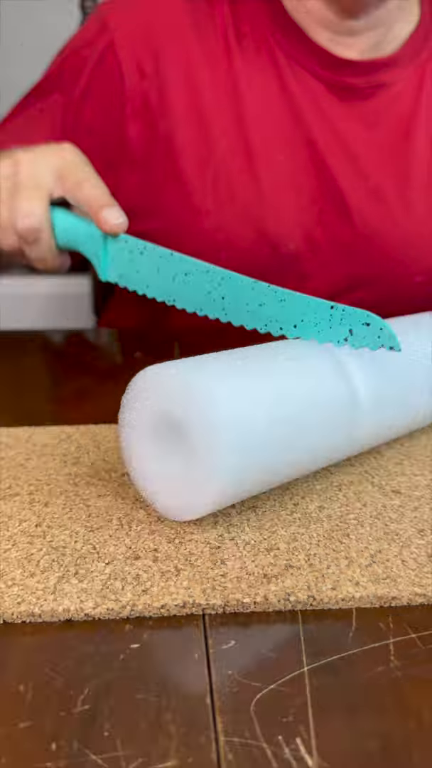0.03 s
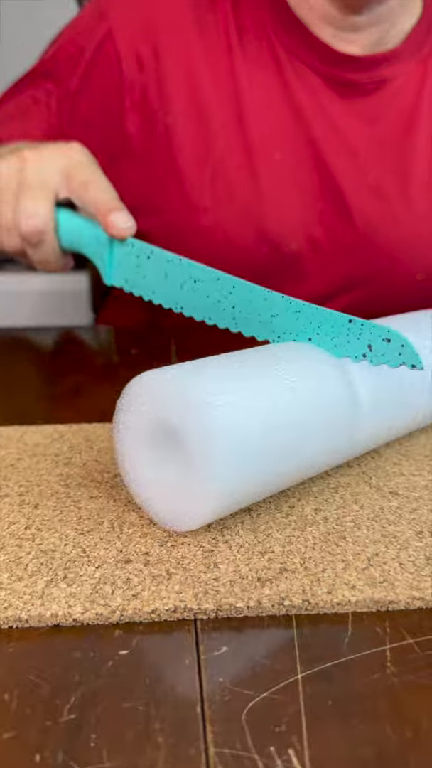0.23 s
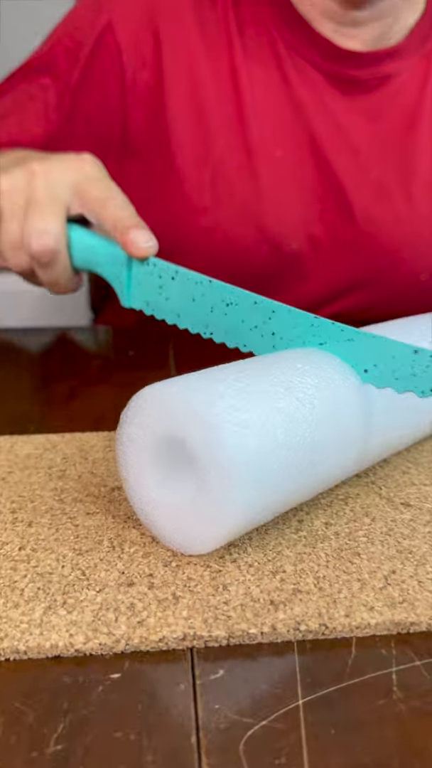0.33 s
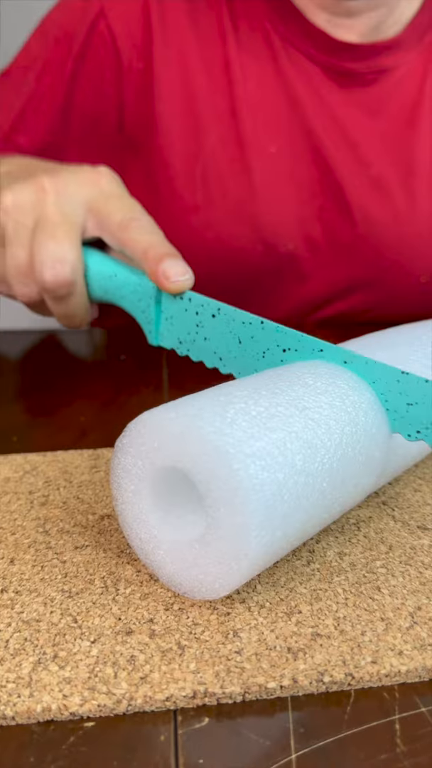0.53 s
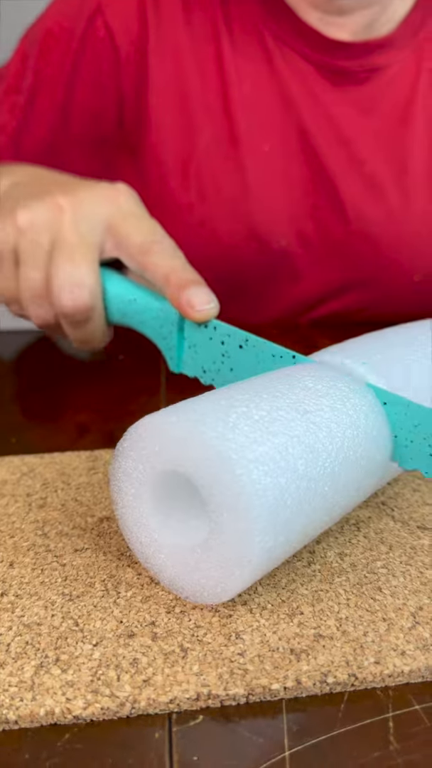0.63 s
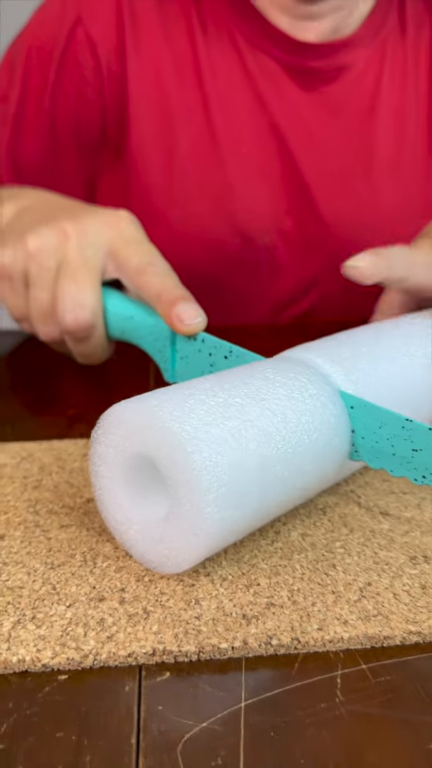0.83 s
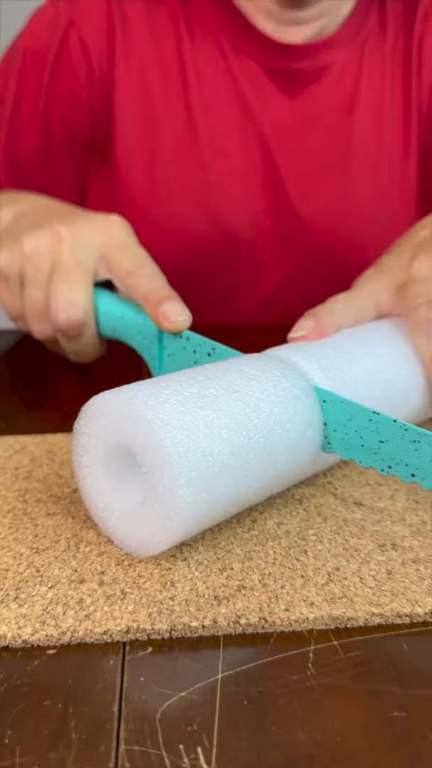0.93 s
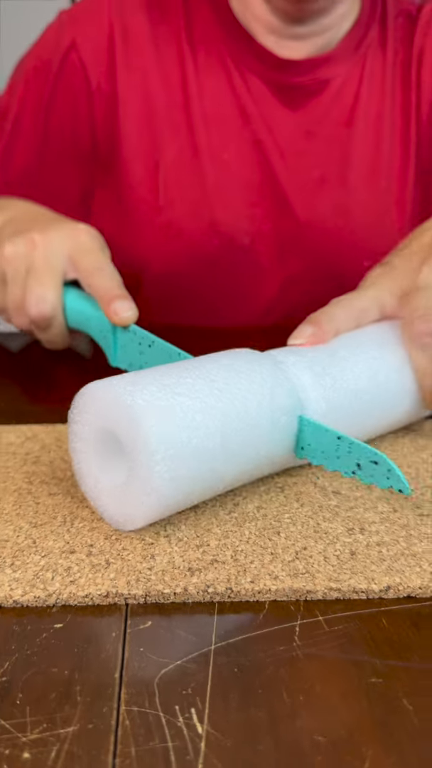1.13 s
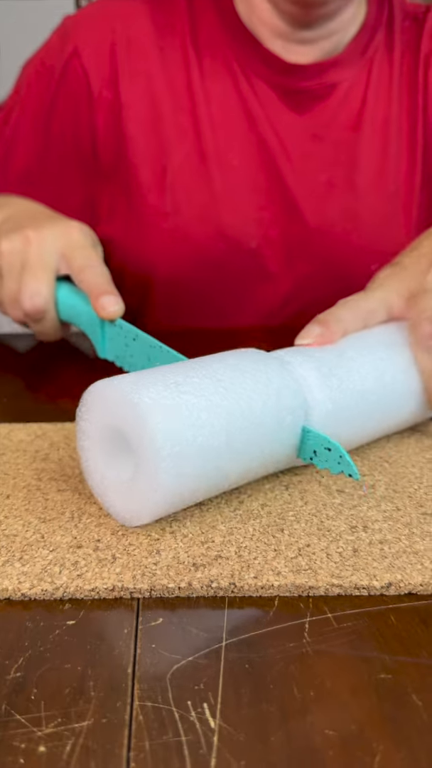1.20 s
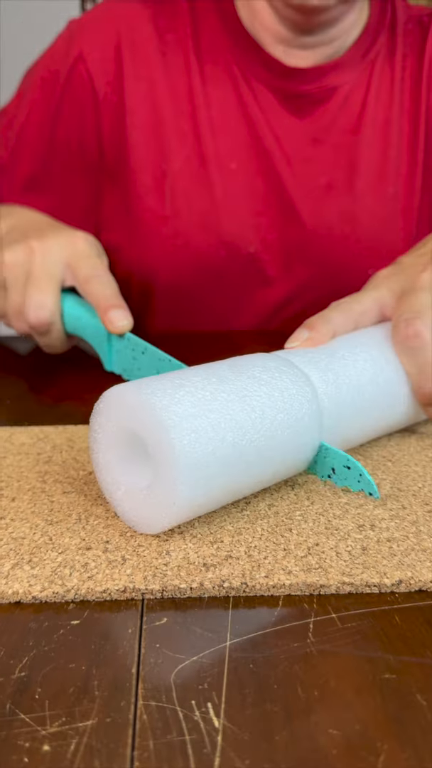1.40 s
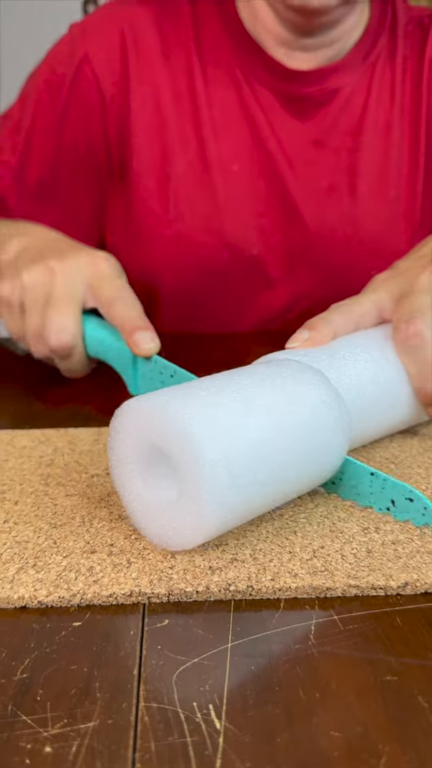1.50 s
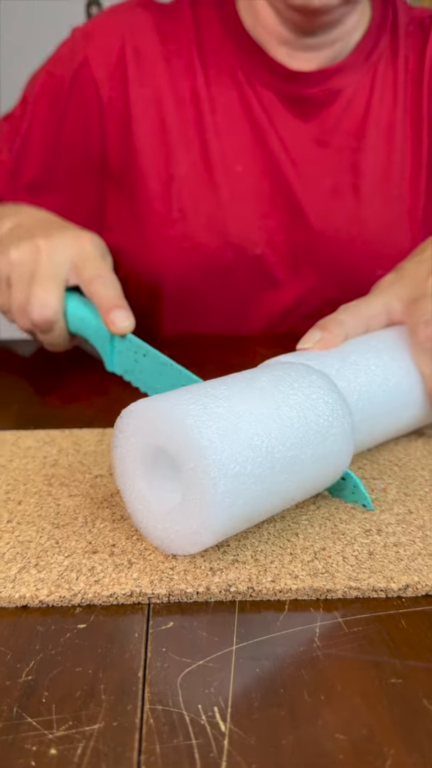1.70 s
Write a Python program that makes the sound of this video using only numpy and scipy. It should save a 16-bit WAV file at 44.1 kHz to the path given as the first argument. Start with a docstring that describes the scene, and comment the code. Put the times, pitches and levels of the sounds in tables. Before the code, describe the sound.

Foam sawing: a coarse crunchy push, table knocks, a finer raspy pull, then a brief last push

```python
"""Over mains hum and room noise, a serrated knife settles on a foam noodle lying on a cork mat: a thin hiss.
A long push bites in: random cell pops, grouped by catching teeth, crackle, sound the tube and shake the mat.
Thicker walls snap on top as cracks with a crumble; pops and snaps all ring and spread in blade and tube.
Between strokes the blade rubs as filtered grain, and decaying modes make table knocks and soft bumps.
A long, finer pull and a short push follow, with a ringing tube, while the hum swells towards the end."""
import sys
import numpy as np
from scipy import signal
from scipy.fft import rfft, irfft
from scipy.io import wavfile
from scipy.ndimage import uniform_filter1d

SR = 44100
rng = np.random.default_rng(int(sys.argv[2]) if len(sys.argv) > 2 else 0)


def int16_out(signal):
    """Quantize to a 16-bit WAV file."""
    q = np.round(np.clip(np.atleast_2d(signal).T, -1, 1) * 32767)
    wavfile.write(sys.argv[1], SR, q.astype(np.int16))


N = 77175


def undb(db):
    """Decibels to gain."""
    return 10 ** (np.asarray(db) / 20)


def unit(x):
    """Scale to rms 1."""
    return x / np.sqrt(np.mean(x ** 2))


def times():
    """Time of every sample [s]."""
    return np.arange(N) / SR


def follow(points, **ends):
    """Gain that follows (time [s], level [dB]) points; ends set the level outside them."""
    at, db = np.array(points).T
    return undb(np.interp(times(), at, db, **ends))


def freqs():
    """Frequencies on which filters are drawn [Hz]."""
    return np.maximum(np.arange(N + 1) * SR / (2 * N), 1)


def through(x, response):
    """Filter by a frequency response, padded so the end does not wrap round."""
    return irfft(rfft(x, 2 * N) * response)[:N]


def shape(points):
    """Join (frequency [Hz], level [dB]) points on a log frequency axis."""
    hz, db = np.array(points, float).T
    return np.interp(np.log(freqs()), np.log(np.maximum(hz, 1)), db)


def colour(x, points):
    """Causal filter through (frequency [Hz], level [dB]) points."""
    # folding the cepstrum forwards gives minimum phase: no sound before its cause
    cepstrum = irfft(np.log(undb(shape(points))))
    cepstrum[1:N] *= 2
    cepstrum[N + 1:] = 0
    return through(x, np.exp(rfft(cepstrum)))


def band(x, lo_hz, hi_hz):
    """Steep band-pass."""
    edges = [lo_hz, min(hi_hz, SR / 2 - 100)]
    return signal.sosfilt(signal.butter(N=3, Wn=edges, btype="band", fs=SR, output="sos"), x)


def walk(rate):
    """Slow random drift with spread near 1, through `rate` new points a second."""
    return np.interp(times() * rate, np.arange(N), rng.standard_normal(N))


def burst(decay_s):
    """Dying noise of unit energy."""
    x = rng.standard_normal(N) * np.exp(-times() / decay_s)
    return x / np.linalg.norm(x)


def tearing(cells_per_s, scatter_db, teeth_hz, release_s, slip):
    """Cells pop at random, hardest just after a tooth catches; slip is the share left between catches."""
    t = times()
    gaps = rng.gamma(3, 1 / 3, size=2000) / teeth_hz
    catches = np.r_[0, np.cumsum(gaps)]
    tooth = np.searchsorted(catches, t, side="right") - 1
    catch_gain = undb(rng.standard_normal(len(catches)))
    grip = slip + catch_gain[tooth] * np.exp(-(t - catches[tooth]) / release_s)
    popping = rng.random(N) < cells_per_s / SR
    sizes = undb(scatter_db * np.clip(rng.standard_normal(N), -2, 2))
    pops = popping * rng.choice([-1, 1], N) * sizes * grip
    # even out the loudness over 25 ms, keeping the grain of the teeth
    return pops / np.sqrt(uniform_filter1d(pops ** 2, int(0.025 * SR)) + 1e-12)


def strikes(events, modes, scatter_db):
    """Each blow rings decaying modes, slightly scattered, with its own weight on the lowest."""
    out = np.zeros(N)
    for at, db, low_db in events:
        age = np.maximum(times() - at, 0)
        luck = rng.standard_normal((len(modes), 2))
        for k, ((hz, mode_db, t60), (level_luck, pitch_luck)) in enumerate(zip(modes, luck)):
            gain = undb(db + mode_db + low_db * (k == 0) + scatter_db * level_luck)
            tone = np.sin(2 * np.pi * hz * (1 + 0.014 * pitch_luck) * age)
            out += (-1) ** k * gain * tone * np.exp(-np.log(1000) * age / t60)
    return out


def scuffs(events, decay_s):
    """A short rush of noise at each event (time [s], level [dB], ...)."""
    t = times()
    rushes = sum(undb(db) * (t >= at) * np.exp(-np.abs(t - at) / decay_s) for at, db, *_ in events)
    return rng.standard_normal(N) * rushes


# tone of the room noise: (frequency [Hz], relative level [dB])
ROOM_TONE = [(30,-1),(70,3.5),(120,-4),(280,7.5),(480,5),(700,-2),(1100,-15.5),(2000,-26),(16000,-45)]
ROOM_DB = -52.5


def air():
    """Low room noise: steady noise filtered towards the bass."""
    return unit(colour(rng.standard_normal(N), ROOM_TONE)) * undb(ROOM_DB)


# hum partials: (frequency [Hz], level before swell and waver [dB], share of the swell [0-1])
HUM_PARTIALS = [(120.3,-68.5,0.15),(240,-54.5,0.12),(475.6,-56,0.88)]
# swell of the hum: (time [s], level change before each partial's share [dB])
HUM_RISE = [(0,-9.5),(1.55,-2.5),(1.72,5)]
HUM_WAVER_DB, HUM_WANDER_RAD = 2, 0.67


def hum():
    """Soft mains hum: sines wavering in level and phase, rising to a swell near the end."""
    t = times()
    swell_db = np.interp(t, *np.array(HUM_RISE).T)
    out = np.zeros(N)
    for hz, db, share in HUM_PARTIALS:
        gain = undb(db + share * swell_db + HUM_WAVER_DB * walk(13.97))
        phase = 2 * np.pi * hz * t + HUM_WANDER_RAD * walk(23.86)
        out += np.sqrt(2) * gain * np.sin(phase)  # root 2: the levels are rms
    return out


# light rubbing of the blade in the slit: (time [s], level [dB])
RUB_LEVEL = [(0.04,-84),(0.12,-67),(0.18,-67),(0.72,-70),(0.757,-39),(0.785,-55),(0.801,-44.5),(0.82,-53.5),(0.845,-45.5),(0.88,-53),(0.9,-45),(0.93,-54),(1.28,-75),(1.48,-42),(1.56,-63),(1.59,-64),(1.617,-51),(1.75,-48.5)]
# its tone: (frequency [Hz], relative level [dB])
RUB_TONE = [(900,-7.5),(1200,-8),(1600,-2),(2500,-3),(4200,0.5),(6000,-3.5),(9000,-9),(16000,-8.5)]


def rubbing():
    """Fine grain of the blade sliding without cutting: dense pops, little gripped by the teeth."""
    grain = tearing(cells_per_s=9900, scatter_db=5.0, teeth_hz=270, release_s=0.0054, slip=0.86)
    return unit(band(colour(grain, RUB_TONE), 820, SR / 2)) * follow(RUB_LEVEL)


# hiss of the blade settling on the foam skin: (time [s], level [dB])
SETTLE_LEVEL = [(0.05,-79),(0.086,-69.5),(0.135,-62),(0.18,-69)]
SETTLE_LO_HZ, SETTLE_HI_HZ = 2920, 4760


def settling():
    """Blade settling on the foam skin: a thin band of noise."""
    hiss = unit(band(rng.standard_normal(N), SETTLE_LO_HZ, SETTLE_HI_HZ))
    return hiss * follow(SETTLE_LEVEL, right=-120)


# low rumble of the noodle shifting on the mat: (time [s], level [dB])
SHIFT_LEVEL = [(0.16, -69), (0.223, -39.5), (0.566, -48), (0.606, -34), (0.802, -48), (0.876, -53),
               (0.908, -48.5), (1.036, -49), (1.066, -53), (1.106, -51.5), (1.236, -49.5), (1.31, -62),
               (1.354, -49.5), (1.416, -70), (1.462, -45.5), (1.612, -82), (1.704, -48.5), (1.75, -54)]
# its tone: (frequency [Hz], relative level [dB])
SHIFT_TONE = [(30,-17),(60,-32),(85,-8),(118,4),(150,-8),(200,-4.5),(300,-11),(1100,-16),(1600,-36),(16000,-83)]


def shifting():
    """The noodle rocks and drags on the cork: bass-heavy noise that comes and goes."""
    return unit(colour(rng.standard_normal(N), SHIFT_TONE)) * follow(SHIFT_LEVEL, left=-120)


def stroke(curve, tone, pops, crackle_db, body_db, rumble_db):
    """One pass of the blade: the same pops crackle, sound the tube and shake the mat."""
    at, *levels = np.array(curve).T
    trims = (crackle_db, body_db, rumble_db)
    bands = [(1200, 17000), (300, 1200), (125, 300)]  # crackle, body, rumble [Hz]
    t, sound = times(), colour(pops, tone)
    gate = np.clip(np.minimum(t - at[0], at[-1] - t) / 0.004 + 1, 0, 1)  # 4 ms ramps
    out = np.zeros(N)
    for edges, db, trim in zip(bands, levels, trims):
        out += unit(band(sound, *edges)) * undb(np.interp(t, at, db) + trim)
    return gate * out


# passes of the blade: (time [s], crackle, tube body and low rumble levels before trim [dB])
BITE_LEVELS = [(0.17, -79, -61, -52), (0.196, -43.5, -47, -37.5), (0.268, -27.5, -34, -42),
               (0.298, -25.5, -34.5, -32), (0.31, -34, -44, -50), (0.332, -26, -35, -46),
               (0.352, -26, -33, -31), (0.392, -28, -36, -44), (0.408, -38, -49.5, -55),
               (0.452, -29.5, -35.5, -36.5), (0.48, -39, -56, -39)]
PUSH_LEVELS = [(0.48, -37, -42, -48), (0.497, -32, -40, -37.5), (0.522, -28.5, -34, -27.5),
               (0.592, -27.5, -35, -34.5), (0.622, -22, -27, -32.5), (0.666, -38.5, -51.5, -52),
               (0.67, -27, -46, -38), (0.692, -30.5, -33.5, -34), (0.714, -44, -67, -45),
               (0.73, -70, -49, -46)]
PULL_LEVELS = [(0.953, -43, -51, -64), (0.968, -45.5, -47, -63), (0.973, -31.5, -43, -56),
               (0.994, -35.5, -50, -63), (1.03, -23, -42, -46), (1.046, -22, -35, -35),
               (1.142, -22.5, -39, -47), (1.15, -19, -33.5, -41.5), (1.172, -24, -39, -35),
               (1.238, -30.5, -44.5, -68), (1.282, -61, -76, -64), (1.29, -59, -70, -66)]
SHORT_LEVELS = [(1.29, -59.5, -66, -62), (1.344, -37, -55, -55), (1.418, -36.5, -46, -46),
                (1.452, -29, -41, -45), (1.466, -31.5, -44, -40), (1.49, -50, -46, -45),
                (1.542, -59, -61, -52), (1.56, -80, -66, -69)]
# tone of each pass: (frequency [Hz], relative level [dB])
BITE_TONE = [(50, -32), (103, -11), (277, -5.5), (428, -3.5), (495, -3.5), (842, -3), (1120, -13),
             (1910, -2), (2440, -16.5), (3180, -7), (4450, -16), (5950, -12), (8750, -20), (14200, -16.5),
             (16000, -16)]
PUSH_TONE = [(50, -53), (85, -8), (114, -9), (246, -8), (495, -2.5), (863, 0), (1240, -12.5), (1960, -4),
             (2620, -7.5), (3180, -3.5), (4140, -8.5), (5810, -9), (7210, -9.5), (11700, -8.5),
             (16000, -12)]
PULL_TONE = [(50, -53), (68, -13), (128, -11), (234, -8.5), (264, -19), (418, -9), (678, -17),
             (1270, -11.5), (1910, -0.5), (2320, -7), (2810, -2), (5810, -8), (9640, -19), (12300, -12.5),
             (16000, -22)]
SHORT_TONE = [(50, -15), (175, -18), (223, -5.5), (264, -11), (306, -5.5), (507, -11), (1360, -6),
              (1740, -9), (2010, -4.5), (2440, -6.5), (6550, -4), (16000, -17.5)]
# resonances of blade and tube: (frequency [Hz], width [Hz], level against the direct sound [dB])
BLADE_TUBE_RINGS = [(211,93,-2.5),(805,107,-2.5),(1930,78,-11.5)]
SPREAD_S = 0.001034  # travel time of a 1 kHz bending wave; higher ones arrive sooner


def cutting():
    """Coarse tearing on the pushes, a finer rasp on the pull, all ringing and spreading in blade and tube."""
    bite = tearing(cells_per_s=3200, scatter_db=2.5, teeth_hz=149.4, release_s=0.0033, slip=0.16)
    push = tearing(cells_per_s=3800, scatter_db=3.0, teeth_hz=170.25, release_s=0.0019, slip=0.28)
    pull = tearing(cells_per_s=11000, scatter_db=3.5, teeth_hz=325.9, release_s=0.00091, slip=0.37)
    short = tearing(cells_per_s=6000, scatter_db=1.5, teeth_hz=210.8, release_s=0.0011, slip=0.22)
    x = stroke(BITE_LEVELS, BITE_TONE, bite, crackle_db=-1.5, body_db=1.0, rumble_db=-3.5)
    x += stroke(PUSH_LEVELS, PUSH_TONE, push, crackle_db=-1.0, body_db=1.0, rumble_db=-9.0)
    x += stroke(PULL_LEVELS, PULL_TONE, pull, crackle_db=-1.5, body_db=-1.5, rumble_db=-6.5)
    x += stroke(SHORT_LEVELS, SHORT_TONE, short, crackle_db=2, body_db=-3.5, rumble_db=-7)
    f = freqs()
    ring = 1
    for hz, width, db in BLADE_TUBE_RINGS:
        ring = ring + undb(db) / (1 + 1j * (f / hz - hz / f) * hz / width)
    bend = np.exp(-4j * np.pi * SPREAD_S * np.sqrt(1000 * f))
    return through(x + snaps(), ring * bend)


# thick cell walls snapping: (time before lag [s], crack level before trim and tone [dB],
# crumble energy against the initial click [dB], low edge [Hz]: thin walls have no bass)
WALL_SNAPS = [(0.1835, -28.5, -8, 300), (0.1959, -23, -2, 300), (0.2321, -12, 6.5, 200),
              (0.2424, -11, -13, 300), (0.2623, -5, 2.5, 400), (0.272, 0.5, -10, 500), (0.3135, -8, 5, 300),
              (0.334, -5, -5, 300), (0.3869, -6.5, -5, 400), (0.4241, -10.5, -8, 297),
              (0.4351, -15, -2, 300), (0.449, -10.5, -4, 300), (0.5033, -11, -16, 1500),
              (0.5314, -16, -14, 300), (0.5665, -29, 2, 300), (0.5792, -4, -15, 1400),
              (0.6041, 1.5, -1.5, 200), (0.6198, -11.5, 5, 300), (0.63, -11, 6, 300), (0.6413, -8, 3, 200),
              (0.657, -17.5, 7, 1200), (0.6717, -3, 1, 300), (0.7507, -17, 7, 400),
              (0.9737, -7, -8.5, 4500), (0.9806, -9.5, -10, 3000), (0.9877, -7.5, -5, 2500),
              (1.1075, -6, -7, 1200), (1.1294, -11, -7, 1200), (1.157, -12, 0, 1200),
              (1.1786, -15, -12, 1500), (1.205, -19, 4, 1200), (1.2568, -24, -6, 2000),
              (1.3146, -25, -0.5, 2500), (1.336, -13, 2.5, 2000), (1.3447, -7, -10, 2500),
              (1.3573, -13, 1, 2500), (1.383, -10.5, -8, 3500), (1.4, -19, -3, 2500),
              (1.4238, -10, 0, 3000), (1.4318, -2.5, -5, 1400), (1.4546, -1, -1.5, 120),
              (1.4649, -6, -2, 3500)]
# their tone: (frequency [Hz], relative level [dB])
SNAP_TONE = [(60,-8),(200,-1),(800,4.5),(1300,-3),(3000,4.5),(6500,5),(9000,-2),(12000,2.5),(16000,-10)]
SNAP_DB, SNAP_LAG_S, SNAP_DECAY_S, CRUMBLE_S = 0.5, 0.0008, 0.00016, 0.0011
SNAP_RAGGED = 0.51  # how far each crack departs from a clean impulse


def snaps():
    """Each thick wall breaks with a sharp crack and a short crumble of noise."""
    out = np.zeros(N)
    for at, db, crumble_db, low_hz in WALL_SNAPS:
        i = int((at + SNAP_LAG_S) * SR)
        tail = SNAP_RAGGED * burst(SNAP_DECAY_S) + undb(crumble_db) * burst(CRUMBLE_S)
        snap = np.r_[1, tail][:N - i]
        b, a = signal.butter(1, low_hz, "high", fs=SR)
        out[i:] += undb(db + SNAP_DB) * signal.lfilter(b, a, snap)
    return colour(out, SNAP_TONE)


# weight of the hand shaking the table: (time [s], level [dB])
HAND_THUDS = [(0.34,-44),(0.57,-44),(0.615,-39),(0.67,-47),(1.462,-58)]
THUD_LO_HZ, THUD_HI_HZ, THUD_S = 49.7, 129, 0.011
# soft bumps of the noodle on the mat: (time [s], level [dB], weight of the lowest mode [dB])
MAT_BUMPS = [(0.772,-34,1),(0.9,-30,0.0057),(1.05,-33,0)]
# their modes: (frequency [Hz], relative level [dB], decay time t60 [s])
MAT_MODES = [(116,0,0.079),(152,2.5,0.028),(233,-19,0.02)]
# jolt that sets the whole tube ringing: (time [s], level [dB], weight of the lowest mode [dB])
TUBE_JOLT = [(1.458, -29.5, 0)]
# modes of the tube: (frequency [Hz], relative level [dB], decay time t60 [s])
TUBE_RINGS = [(215.4, -2, 0.16), (286, -7.5, 0.18), (462, -9.5, 0.27)]


def handling():
    """Deep thuds of band-passed noise, then soft modal bumps and the ring of the jolted tube."""
    thuds = band(scuffs(HAND_THUDS, THUD_S), THUD_LO_HZ, THUD_HI_HZ)
    thuds *= np.sqrt(SR / 2 / (THUD_HI_HZ - THUD_LO_HZ))  # make up the power lost outside the band
    bumps = strikes(MAT_BUMPS, MAT_MODES, scatter_db=3.0)
    return thuds + bumps + strikes(TUBE_JOLT, TUBE_RINGS, scatter_db=0.5)


# knocks on the table: (time [s], level before trim [dB], weight of the lowest mode [dB])
TABLE_KNOCKS = [(0.726, -35, 3), (0.752, -28, 0.5), (0.892, -24.5, -7), (0.941, -21.5, 0),
                (1.455, -28.5, -3), (1.582, -32.5, 2.5)]
# modes of the table: (frequency [Hz], relative level [dB], decay time t60 [s])
TABLE_MODES = [(484,6,0.034),(656.5,-0.5,0.081),(810,-18,0.02),(930,-0.5,0.058),(1155,-5.5,0.13),(1318,-9,0.096),(1640,-5.5,0.093)]
KNOCK_DB, KNOCK_LO_HZ, KNOCK_HI_HZ = -12, 338, 1420
KNOCK_SCUFF_DB, KNOCK_SCUFF_S = 7, 0.0052


def knocks():
    """Knocks ring the modes of the table, each with a scuff of contact noise."""
    blows = strikes(TABLE_KNOCKS, TABLE_MODES, scatter_db=1.0)
    blows += undb(KNOCK_SCUFF_DB) * scuffs(TABLE_KNOCKS, KNOCK_SCUFF_S)
    return undb(KNOCK_DB) * band(blows, KNOCK_LO_HZ, KNOCK_HI_HZ)


# side level of the cut, narrower once the blade is buried: (time [s], relative level [dB])
CUT_SPREAD = [(0.72, 2), (0.97, -5)]
# stereo width: (frequency [Hz], side gain before trim [dB])
SIDE_TONE = [(60,-17),(120,-14),(330,-19.5),(700,-13),(1350,-7),(2300,-10),(3500,-24.5),(5200,-8.5),(8000,-8),(12000,-7),(15500,-0.5)]
# stereo lean: (frequency [Hz], left minus right [dB])
LEFT_LEAN = [(300,0),(700,0),(1300,3),(2300,1),(4400,0.8),(9000,.5)]
ROOM_T60_S, ECHO_DB, EARLY_S, EARLY_DB = 0.2, -17, 0.0059, -9.5
WIDTH_DB, KNOCK_WIDTH_DB = 2, 2.5  # the table top radiates from all around
SCATTERED = 0.57  # side share of cells popping along the cut


def scene():
    """Direct sound and table reflections, spread over two channels, with a short room tail."""
    tail_s = ROOM_T60_S / np.log(1000)
    cut = cutting()
    near = cut + rubbing() + shifting() + knocks() + settling() + handling()
    echoes = undb(EARLY_DB) * burst(EARLY_S) + undb(ECHO_DB) * burst(tail_s)
    mid = near + signal.fftconvolve(near, echoes)[:N] + hum() + air()
    # reflections and cells along the cut reach the two microphones differently
    side_echoes = 0.5 * burst(EARLY_S) + 0.35 * burst(tail_s)
    stray = signal.fftconvolve(near, side_echoes)[:N]
    sources = (0.3 * cut + SCATTERED * cutting()) * follow(CUT_SPREAD)
    sources += undb(KNOCK_WIDTH_DB) * knocks()
    stray += through(sources, 1j)  # quarter-turn of phase
    stray += 0.6 * rubbing() + 2 * settling() + 0.76 * shifting() + air()
    side = through(stray, undb(shape(SIDE_TONE) + WIDTH_DB))
    lean_db = shape(LEFT_LEAN) / 2
    left = through(mid + side, undb(lean_db))
    right = through(mid - side, undb(-lean_db))
    return np.array([left, right])


START_S, LOW_CUT_HZ, TOP_HZ = 0.038, 82, 15850


def record(dry):
    """The sound fades in quickly; the recorder thins the deep bass and cuts the top."""
    faded = dry * np.clip((times() - START_S) / 0.018, 0, 1)
    thinned = signal.sosfilt(signal.butter(2, LOW_CUT_HZ, "high", fs=SR, output="sos"), faded)
    return signal.sosfilt(signal.ellip(10, 0.2, 80, TOP_HZ, fs=SR, output="sos"), thinned)


dry = scene()
out = record(dry)
int16_out(out)
```